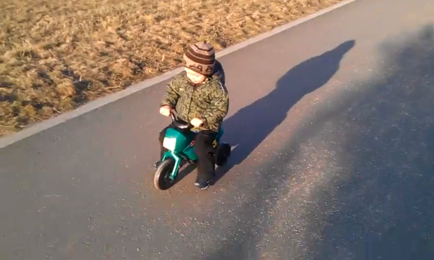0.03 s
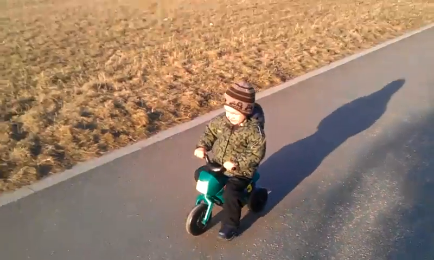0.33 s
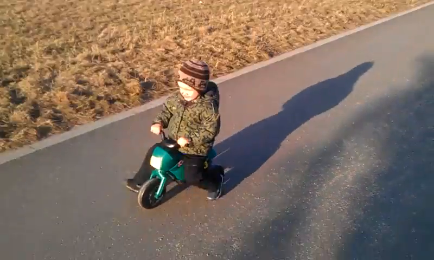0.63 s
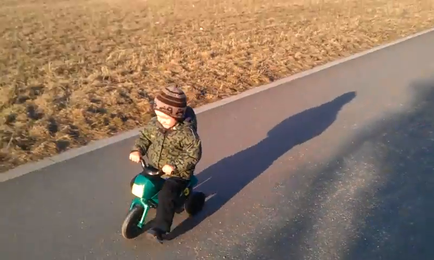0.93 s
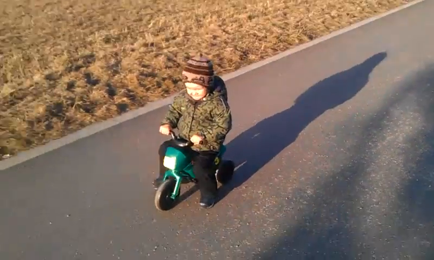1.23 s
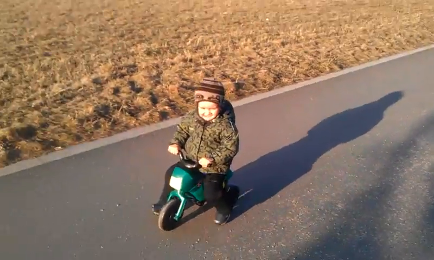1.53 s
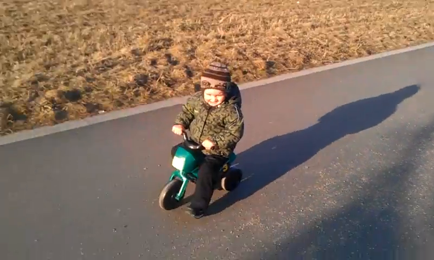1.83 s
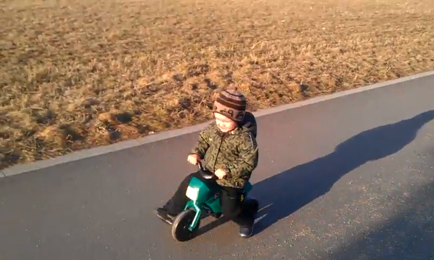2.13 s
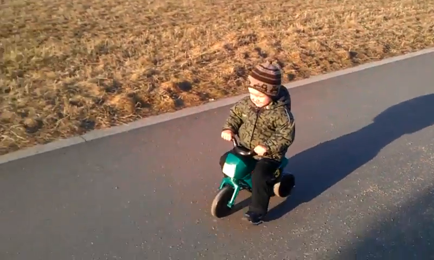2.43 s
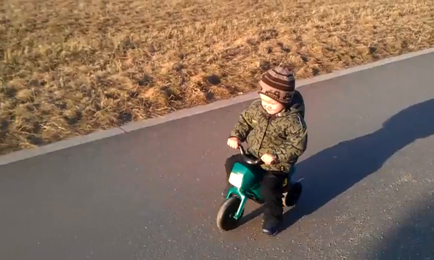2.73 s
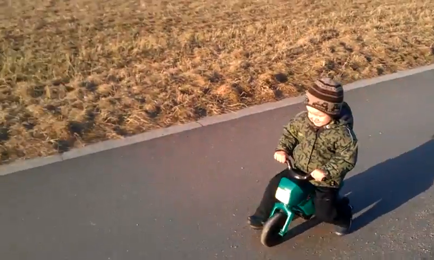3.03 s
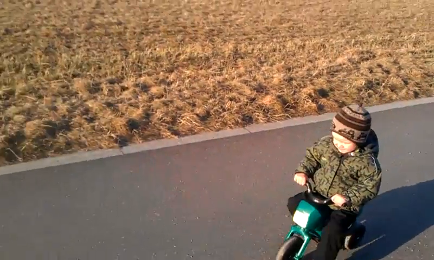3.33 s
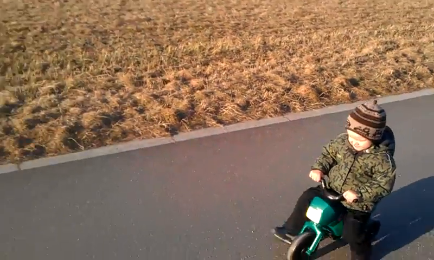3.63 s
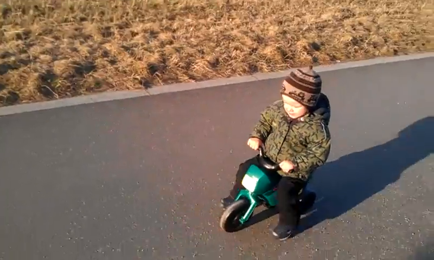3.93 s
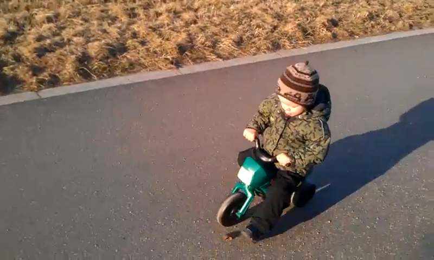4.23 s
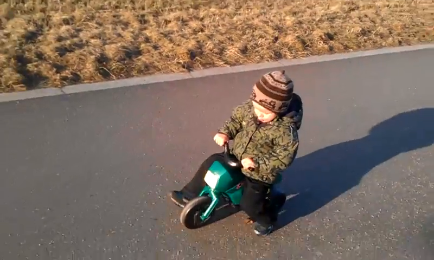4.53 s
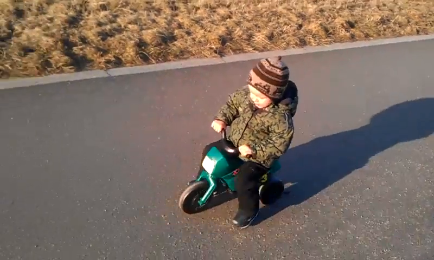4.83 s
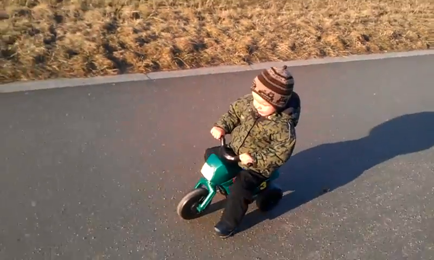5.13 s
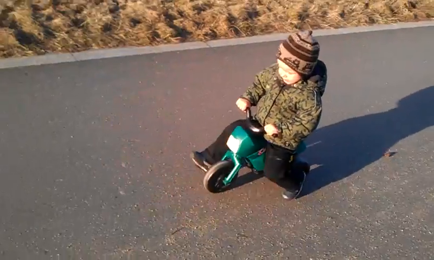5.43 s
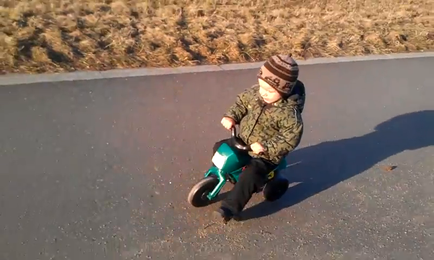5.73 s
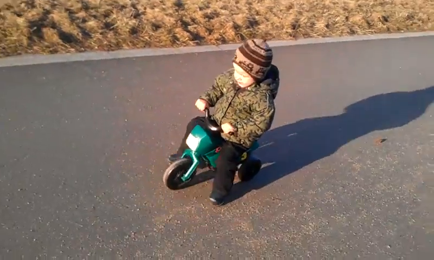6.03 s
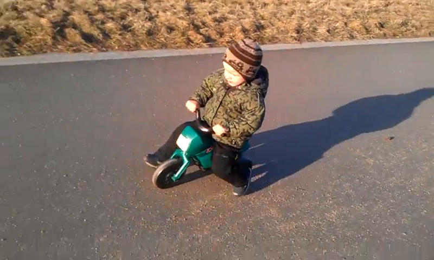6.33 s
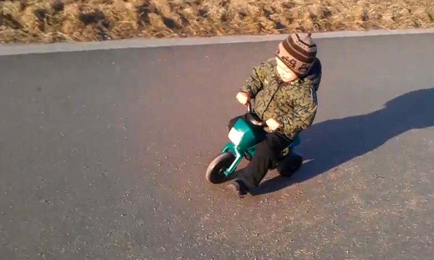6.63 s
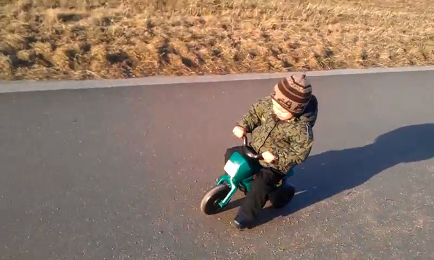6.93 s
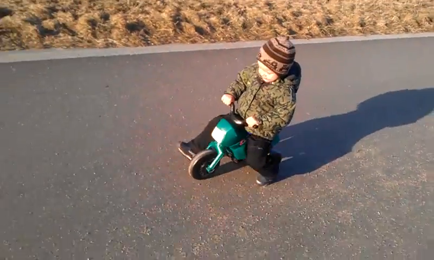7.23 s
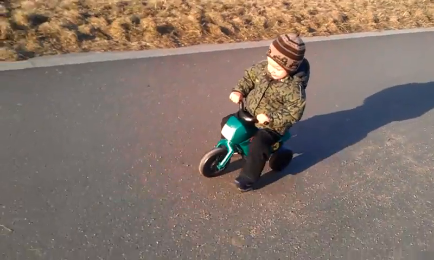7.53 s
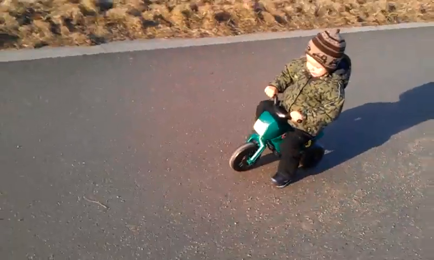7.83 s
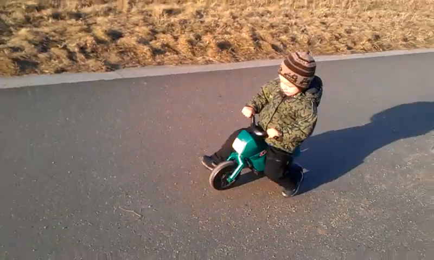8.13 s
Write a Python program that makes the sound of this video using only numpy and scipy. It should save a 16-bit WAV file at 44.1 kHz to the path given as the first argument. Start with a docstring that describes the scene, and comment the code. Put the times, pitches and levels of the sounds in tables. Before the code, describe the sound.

Hard wheels of a plastic ride-on tricycle rattle and tick over gritty asphalt, with hollow knocks, shoe scuffs and light wind.

```python
"""A toddler pushes a plastic ride-on tricycle along an asphalt path, a few steps from the microphone.
From the start and throughout, a light wind rumbles, loose hard wheels tick on their axles, grit
crackles under the treads and the hollow body drums on the rough ground, with scattered scuffs, shoves,
clacks and knocks. The toy draws level, the delay of a close reflection shortens, and the rolling is
loudest just after 4 s. It then eases, while the wheels chatter on to the end."""
import sys
import numpy as np
from scipy import signal
from scipy.fft import rfft, irfft
from scipy.io import wavfile
from scipy.ndimage import uniform_filter1d, map_coordinates

SR = 44100
rng = np.random.default_rng(int(sys.argv[2]) if len(sys.argv) > 2 else 0)


def unload_audio(sound):
    """Save the sound as a 16-bit wav file, at the path given as the first command line argument."""
    columns = np.transpose(np.atleast_2d(sound))
    # keep every value between -1 and 1, then stretch to whole-number steps
    steps = np.round(np.clip(columns, -1, 1) * 32767)
    wavfile.write(sys.argv[1], SR, steps.astype(np.int16))


N = 369558
TIME = np.arange(N) / SR

# spectra of the sources: (frequency [Hz], relative spectral density [dB])
WIND_SPECTRUM = [(15, -19), (35, -4.5), (58, -8.5), (90, -4.5), (200, -12), (800, -28.5)]
RUMBLE_SPECTRUM = [(70, -32), (120, 3), (270, -8), (900, -25.5)]
GRIT_SPECTRUM = [(80, -75), (500, -1), (1100, 3.5), (1500, 3), (2000, 8.5), (2500, 8), (2950, 4.5),
                 (3470, 7.5), (4300, -1.5), (7000, 0), (15000, -17)]
BODY_SPECTRUM = [(50, -28.5), (120, -12), (230, -8.5), (330, -5), (500, -6.5), (670, 2.5), (860, -3.5),
                 (1050, -4), (1300, -18), (5000, -24)]
CLACK_SPECTRUM = [(100, -28), (700, -4), (1300, -7.5), (2100, -3), (3200, -1), (4400, 1), (6000, -1.5),
                  (15000, -40)]
TICK_SPECTRUM = [(60, -42), (400, -12.5), (1400, -22.5), (2300, -9.5), (3000, -11.5), (3500, -10),
                 (4400, -9), (5300, -6.5), (6800, -1.5), (8200, -2.5), (9300, -3.5), (10500, -7),
                 (13000, -10.5), (16000, -23.5)]
# modes of the hollow shell and of wheel and axle: (frequency [Hz], bandwidth [Hz], relative level [dB])
SHELL_MODES = [(338, 81, -1.5), (396, 54, -2), (660.4, 39, -2.5), (813, 21, -1), (927, 95, -1)]
WHEEL_MODES = [(3418, 46, 0), (5160, 680, -15), (5860, 340, -11), (7370, 490, -14.5), (7980, 1280, -4.5)]
# gusts on the microphone: (centre time [s], duration [s], peak level [dB])
GUSTS = [(.1, 0.075, -43.5), (2.2, .3, -67), (4.05, 0.5, -49), (4.21, .17, -41), (5.35, 0.4, -53),
         (7.58, 0.24, -56)]
# lag of a close reflection, shrinking as the toy draws level: (time [s], delay [ms])
REFLECTION_DELAY = [(0, 1.55), (1.9, 1.56), (2.5, 1.56), (3.05, 0.77), (3.5, 0.73), (3.8, 0.63),
                    (4.4, 0.47), (4.9, 0.56), (5.45, 0.33), (6.1, 0.5), (6.75, 0.36), (7.3, 0.5)]
# steady rolling, loudest while the toy is near: (time [s], relative level [dB])
ROLLING_LEVEL = [(0, -40.5), (1.2, -43), (2.5, -41.5), (3.0, -39.5), (3.9, -39.5), (4.3, -34), (5.1, -38.5),
                 (6.2, -40), (6.8, -42), (8.38, -39.5)]
# soles dragging on grit: (centre time [s], duration [s], relative level [dB], rasp frequency [Hz])
SCUFFS = [(0.524, 0.14, -34, 1840), (1.54, 0.19, -41.5, 2140), (2.18, 0.16, -42, 1930),
          (2.855, 0.25, -38, 2280), (3.396, 0.35, -39.5, 2530), (3.727, 0.057, -38, 2500),
          (4.023, 0.16, -37.5, 2580), (4.287, 0.28, -36.5, 2000), (4.566, 0.053, -40, 1880),
          (4.833, 0.039, -35, 1740), (5, 0.039, -34, 2080), (5.11, 0.094, -39, 1900),
          (5.276, 0.054, -35, 2000), (5.75, 0.11, -33, 2880), (6.314, 0.055, -32, 2420),
          (7.72, 0.047, -43, 2620)]
# harder drumming as the feet shove the toy on: (centre time [s], duration [s], peak level [dB])
SHOVES = [(.2, 0.13, -37), (.46, 0.26, -36), (1.53, 0.2, -31.5), (1.93, 0.27, -40), (2.16, 0.32, -39),
          (2.83, 0.094, -33), (3.3, 0.33, -40), (4.47, 0.13, -39.5), (4.79, 0.47, -43), (5.11, 0.087, -36),
          (5.97, 0.12, -35), (6.14, 0.2, -38.5), (6.57, 0.22, -40), (7.2, 0.27, -36.5), (7.93, 0.22, -36)]
# bumps striking the hollow body: (time [s], peak level [dB], ring frequency [Hz])
KNOCKS = [(0.978, -23, 952), (1.493, -28, 690), (1.721, -25.5, 620), (1.758, -30, 920), (1.86, -33, 800),
          (2.12, -32, 680), (2.191, -24.5, 830), (2.755, -27.5, 765), (3.4, -30, 665), (3.64, -27, 774),
          (4.289, -24, 732), (4.419, -26, 875), (4.461, -21, 875), (4.577, -28.5, 800), (4.723, -26.5, 350),
          (4.763, -24, 861), (4.819, -20, 690), (4.829, -22, 752), (5.102, -28.5, 828), (5.283, -25, 700),
          (5.804, -30.5, 660), (5.949, -33, 726), (6.04, -22.5, 843), (6.148, -26.5, 674),
          (6.298, -26.5, 877), (6.944, -19.5, 738), (7.197, -29.5, 697), (7.761, -28, 753)]
# impacts of plastic on plastic: (time [s], relative level [dB], 60 dB decay time [s])
CLACKS = [(0.513, -23, 0.0092), (0.8845, -22, 0.0035), (0.9601, -16.5, 0.028), (3.002, -14.5, 0.0099),
          (4.002, -15, 0.005), (4.022, -27, .012), (4.324, -28, .015), (4.827, -39, .07),
          (5.255, -23.5, .02), (5.9, -48, .012), (6.315, -20, 0.036), (6.941, -27, 0.09)]
# wheels biting into grit: (centre time [s], duration [s], relative level [dB])
GRIT_BITES = [(0.36, 0.22, -24.0), (0.591, 0.069, -24), (0.715, 0.36, -34), (0.803, 0.086, -21),
              (1.022, 0.17, -24.5), (1.19, 0.12, -19), (1.36, 0.13, -20.5), (1.508, 0.41, -28),
              (1.765, 0.24, -28.5), (1.882, 0.081, -26), (2.176, 0.47, -26.0), (2.69, 0.069, -21),
              (2.89, 0.61, -29.5), (3.02, 0.18, -28.5), (3.141, 0.094, -22), (3.443, 0.096, -25.5),
              (3.516, 0.081, -19), (3.604, 0.12, -28), (3.746, 0.095, -19), (3.862, 0.14, -20.5),
              (4.11, 0.41, -29), (4.327, 0.081, -23), (4.546, 0.19, -27), (4.873, 0.12, -30),
              (5.091, 0.11, -21.5), (5.196, 0.084, -20.5), (5.37, 0.15, -23.0), (5.506, 0.36, -29.5),
              (5.753, 0.16, -19.5), (5.974, 0.34, -26), (6.114, 0.1, -21.5), (6.404, 0.12, -19),
              (6.69, 0.21, -27), (6.813, 0.086, -22.5), (7, 0.12, -36), (7.085, 0.094, -25),
              (7.447, 0.046, -26.5), (7.678, 0.44, -32), (7.81, 0.049, -24.0), (7.992, 0.14, -31)]
# hard wheels striking stones: (time [s], level [dB], ring frequency [Hz])
TICKS = [(0.1442, -9.5, 7940), (0.218, -12, 8500), (0.283, -9.5, 7970), (0.3563, -14.0, 7900),
         (0.3649, -15.0, 7900), (0.382, -17, 9300), (0.4022, -16.5, 7600), (0.417, -16.5, 7300),
         (0.4764, -15.5, 7700), (0.5505, -16, 8950), (0.564, -14, 9000), (0.5734, -15.5, 7600),
         (0.5863, -15.5, 8300), (0.6727, -15, 6700), (0.7392, -19, 7400), (0.7916, -17, 8100),
         (0.8127, -18, 7800), (0.823, -14.0, 7900), (0.8835, -14.0, 7740), (0.9607, -18, 4850),
         (0.989, -14.5, 9500), (1.0044, -10, 7600), (1.148, -14.5, 8700), (1.1707, -15, 8150),
         (1.1894, -19, 8700), (1.215, -27, 7900), (1.2338, -16, 6900), (1.3056, -14.5, 8300),
         (1.33, -17.5, 6800), (1.3522, -18, 7050), (1.3865, -20, 7700), (1.3975, -23.5, 7300),
         (1.7055, -16, 7900), (1.76, -13.5, 8400), (1.7795, -13, 8000), (1.814, -15, 8150),
         (1.8271, -14.5, 6100), (1.886, -13.5, 8100), (1.8965, -14.5, 8900), (1.97, -16.0, 7900),
         (1.9964, -24.5, 7520), (2.0245, -20, 8300), (2.034, -11.5, 8200), (2.1266, -15, 7850),
         (2.331, -19.5, 8300), (2.4754, -13, 7800), (2.4838, -17.5, 7500), (2.5466, -16.5, 7600),
         (2.573, -17.5, 7500), (2.6564, -8.5, 7140), (2.6794, -10, 8400), (2.6905, -16, 8400),
         (2.748, -14, 5800), (2.7604, -13.5, 7800), (2.7715, -14, 8400), (2.779, -21, 8100),
         (2.8146, -13.5, 7600), (2.8302, -13.5, 7800), (2.845, -18, 8400), (2.8728, -17, 8000),
         (2.914, -19, 7300), (2.923, -12.5, 7800), (2.981, -21, 7800), (3.002, -14, 4550),
         (3.0393, -15.5, 8600), (3.1309, -12.5, 8500), (3.151, -14, 7260), (3.2288, -15, 9600),
         (3.4012, -13.5, 7800), (3.458, -16, 8100), (3.4868, -11, 8100), (3.5072, -22, 8100),
         (3.5199, -16.5, 7140), (3.575, -18, 8360), (3.5846, -17, 7100), (3.603, -12, 8150),
         (3.6293, -16, 8400), (3.6932, -14.5, 7460), (3.728, -14, 7300), (3.772, -16, 8100),
         (3.8249, -17, 7850), (3.8545, -13.5, 7600), (3.905, -17, 8100), (4.0029, -15, 5200),
         (4.0895, -11, 5850), (4.1125, -14.5, 8000), (4.1259, -21, 8100), (4.1355, -15, 7400),
         (4.1992, -15.5, 8150), (4.2731, -13, 8400), (4.2998, -11.5, 8200), (4.3246, -15.5, 8200),
         (4.3337, -19, 8500), (4.3556, -16.5, 7000), (4.3873, -15.5, 7100), (4.4524, -16, 7400),
         (4.4705, -12, 7300), (4.5461, -13.5, 8300), (4.574, -15, 8400), (4.63, -14, 7700),
         (4.6407, -13, 9000), (4.749, -13, 6200), (4.816, -17.5, 5800), (4.8254, -13.5, 8240),
         (4.8762, -17, 8100), (4.9, -16.5, 8900), (4.9224, -13, 6000), (4.9444, -15.5, 7800),
         (5.0386, -17.0, 7800), (5.0859, -12, 8200), (5.097, -15.5, 7600), (5.1044, -17.5, 6900),
         (5.1778, -14, 7000), (5.326, -17, 7600), (5.3472, -15, 8140), (5.3613, -12, 5250),
         (5.374, -18, 5100), (5.383, -15.5, 7600), (5.4222, -19, 7600), (5.5336, -17, 7900),
         (5.5513, -15, 7800), (5.5651, -15, 7900), (5.5979, -16, 8800), (5.6599, -14, 7700),
         (5.6826, -16, 7840), (5.7201, -12.5, 5750), (5.771, -15, 8100), (5.786, -24, 7300),
         (5.8437, -19.5, 8300), (5.8606, -15, 5440), (5.892, -21, 8400), (5.9001, -7, 4600),
         (5.9197, -22, 8500), (5.9307, -13.5, 8500), (5.959, -15, 5100), (5.9978, -16.0, 7900),
         (6.0768, -14.0, 8500), (6.0915, -10, 7200), (6.2025, -13.5, 7200), (6.244, -9.5, 5430),
         (6.3198, -13.5, 8900), (6.3344, -16, 7040), (6.3492, -17, 6900), (6.3667, -12, 6850),
         (6.3809, -14.5, 6700), (6.4048, -22, 7200), (6.4179, -17.0, 7300), (6.47, -13.5, 6800),
         (6.6203, -8.5, 8000), (6.6878, -13.5, 7800), (6.6993, -13.5, 7700), (6.7368, -15.5, 8200),
         (6.7963, -10, 8100), (6.8253, -16.5, 7700), (6.842, -15, 9200), (6.889, -15, 8200),
         (6.9354, -14.5, 7400), (6.96, -13.5, 9000), (6.9938, -10.5, 9300), (7.0966, -14, 8900),
         (7.1033, -13, 7600), (7.1958, -13.5, 7600), (7.241, -16.5, 7500), (7.297, -13, 7350),
         (7.4441, -15, 9100), (7.4594, -15, 6760), (7.591, -7, 9400), (7.6438, -16.5, 7400),
         (7.6753, -15, 7900), (7.6881, -13, 7500), (7.704, -14.5, 8100), (7.7232, -18, 7860),
         (7.7392, -10, 7900), (7.8085, -14, 7400), (7.8205, -15, 7900), (7.8835, -13, 7900),
         (7.92, -13, 8000), (7.962, -9, 7800), (7.981, -13.5, 8200), (8.0252, -13, 7850),
         (8.0745, -13, 8560), (8.1115, -9, 8200), (8.1302, -19, 8500), (8.232, -13.5, 7800),
         (8.3203, -13.5, 8900)]


def undb(db):
    """Amplitude ratio of a level in decibels."""
    return 10 ** (np.asarray(db) / 20)


def unit(x):
    """Normalisation to rms 1."""
    return x / np.sqrt(np.mean(x ** 2))


def unit_peak(x):
    """Normalisation of the loudest 2 ms to rms 1."""
    return x / np.sqrt(uniform_filter1d(x ** 2, 88).max())


def curve(table):
    """Linear interpolation of (time, value) rows at every sample."""
    return np.interp(TIME, *np.transpose(table))


def add(out, start_s, x):
    """Superposition of x on out, beginning at start_s."""
    i = int(np.clip(start_s * SR, 0, len(out) - 1))
    out[i:i + len(x)] += x[:len(out) - i]


def fade(t, t60):
    """Exponential decay by 60 dB in t60 seconds."""
    return np.exp(-np.log(1000) * t / t60)


def swells(table):
    """Amplitude envelope of half-sine arches, one for each (centre time, duration, level) row."""
    gain = np.zeros(N)
    for centre, length, db in table:
        add(gain, centre - length / 2, undb(db) * np.sin(np.linspace(0, np.pi, int(length * SR))))
    return gain


def wander(rate_hz):
    """Slow random modulation of rms 1: Gaussian values joined by straight lines."""
    step = int(SR / rate_hz)
    return unit(uniform_filter1d(np.repeat(rng.standard_normal(N // step + 1), step), step)[:N])


def grains(per_s, spread_db):
    """Poisson process of impulses with log-normal amplitudes."""
    chance, size = rng.random(N), rng.standard_normal(N)
    return (chance < per_s / SR) * undb(spread_db * np.clip(size, -2, 2))


def bursts(hits, t60):
    """Incoherent summation: each impulse starts a decaying noise burst, and their powers add."""
    power = signal.fftconvolve(hits ** 2, fade(TIME[:SR // 10], t60) ** 2)[:N]
    return np.sqrt(np.abs(power)) * rng.standard_normal(N)


def colour(x, spectrum, size=4096):
    """Minimum-phase filtering to a given spectrum; folding the cepstrum makes the response causal."""
    hz, db = np.transpose(spectrum)
    bins = np.maximum(np.arange(size // 2 + 1) * SR / size, 1)
    magnitude = undb(np.interp(np.log(bins), np.log(hz), db))
    cepstrum = irfft(np.log(magnitude))
    cepstrum[1:size // 2] *= 2
    cepstrum[size // 2 + 1:] = 0
    return signal.fftconvolve(x, irfft(np.exp(rfft(cepstrum))))[:len(x)]


def resonate(x, hz, width_hz):
    """Forced response of a damped resonator, with gain 1 at its centre."""
    return signal.lfilter(*signal.iirpeak(hz, hz / width_hz, fs=SR), x)


def delayed(x, lag_s):
    """Propagation delay along a path of changing length."""
    return map_coordinates(x, [np.arange(N) - lag_s * SR], order=3)


def wind(flutter_db=1.5, breeze_db=-58):
    """Turbulence: pressure fluctuations on the microphone make a low rumble with a few gusts."""
    rumble = unit(colour(rng.standard_normal(N), WIND_SPECTRUM))
    breeze = undb(breeze_db + flutter_db * wander(rate_hz=13))
    return rumble * np.hypot(breeze, swells(GUSTS))


def treads(rumble_db=-52, hiss_db=-44):
    """Roughness excitation: steady rolling contact gives a lumpy low rumble and a fine even hiss."""
    lumps = bursts(grains(per_s=160, spread_db=4), t60=0.014)
    rumble = unit(colour(lumps, RUMBLE_SPECTRUM))
    hiss = unit(colour(rng.standard_normal(N), TICK_SPECTRUM))
    return undb(rumble_db) * rumble + undb(hiss_db) * hiss


def with_reflections(direct, near_db=-6, legs_db=-9, legs_lag_s=0.001093, sway=0.191):
    """Comb filtering: reflections from a close surface and the swinging legs join the direct sound."""
    # small surfaces mirror only the short waves
    treble = signal.sosfilt(signal.butter(1, 1500, "high", fs=SR, output="sos"), direct)
    softened = signal.sosfiltfilt(signal.butter(1, 6000, fs=SR, output="sos"), treble)
    near = delayed(softened, curve(REFLECTION_DELAY) / 1000)
    legs = delayed(treble, legs_lag_s * np.exp(sway * wander(rate_hz=4)))
    return direct + undb(near_db) * near + undb(legs_db) * legs


def scattered_tail(chatter, t60=0.024, gain_db=-13):
    """Diffuse scattering: ground and frame spread the chatter into a faint smooth tail."""
    return undb(gain_db) * np.std(chatter) * unit(wheel_response(bursts(chatter, t60)))


def axle_sizzle(impacts, hz=8200, width_hz=660, t60=0.13, gain_db=-10):
    """Resonant decay: a high resonance of the axle keeps sizzling after the ticks that excite it."""
    ring = resonate(bursts(impacts, t60), hz, width_hz)
    return undb(gain_db) * np.std(impacts) * unit(resonate(ring, hz, width_hz))


def grit_crackle(gain_db=-8.5, wander_db=3, ring_db=2, sizes=6):
    """Shot noise: grit crackles under the treads in clusters, coarse grains lower than fine ones."""
    crackle = np.zeros(N)
    for hz in np.geomspace(2000, 5000, sizes):
        grit = bursts(grains(per_s=520 / sizes, spread_db=5), t60=0.011)
        crackle += grit + undb(ring_db) * resonate(grit, hz, hz / 5)
    level_db = curve(ROLLING_LEVEL) + gain_db + wander_db * wander(rate_hz=20)
    return unit(colour(crackle, GRIT_SPECTRUM)) * undb(level_db)


def sole_scuffs(rasp_db=-3, rasp_width_hz=900, gain_db=-1):
    """Sliding friction: each sole drags over the grit in a broken crunch with a rasp of its own pitch."""
    out = np.zeros(N)
    grit = colour(bursts(grains(per_s=380, spread_db=5), t60=0.011), GRIT_SPECTRUM)
    for *swell, hz in SCUFFS:
        rasp = undb(rasp_db) * resonate(grit, hz, rasp_width_hz)
        out += swells([swell]) * unit(grit + rasp)
    return undb(gain_db) * out


def body_drumming(chatter, jolt_db=-8, jolt_t60=0.054, ring_db=-5):
    """Forced vibration: rough ground and wheel ticks shake the hollow shell, and bumps ring its modes."""
    road = unit(bursts(grains(per_s=200, spread_db=5.5), t60=0.032))
    jolts = undb(jolt_db) * unit(bursts(chatter, jolt_t60))
    drum = unit(colour(road + jolts, BODY_SPECTRUM))
    modes = sum(undb(db) * unit(resonate(grains(per_s=40, spread_db=3), hz, width))
                for hz, width, db in SHELL_MODES)
    ring = undb(ring_db) * unit(colour(modes, BODY_SPECTRUM))
    return unit(drum + ring) * np.hypot(undb(curve(ROLLING_LEVEL)), swells(SHOVES))


def body_knocks(thud_t60=0.057, ring_db=1, ring_t60=0.061, bounce_s=0.012, bounce_db=-4):
    """Free vibration: the shell thuds and rings at a bump, and rings again as the toy drops back."""
    out, t = np.zeros(N), TIME[:SR // 8]
    for start, db, hz in KNOCKS:
        thud = unit_peak(colour(rng.standard_normal(len(t)) * fade(t, thud_t60), BODY_SPECTRUM))
        late, detune = np.clip(rng.standard_normal(2), -2, 2)
        bounce_hz = hz * np.exp(0.085 * detune)
        ring, bounce = (np.sin(2 * np.pi * f * t) * fade(t, ring_t60) for f in (hz, bounce_hz))
        add(ring, bounce_s * np.exp(0.3 * late), undb(bounce_db) * bounce)
        add(out, start, undb(db) * unit_peak(thud + undb(ring_db) * unit_peak(ring)))
    return out


def plastic_clacks(tail_db=-16, tail_t60=0.21, gain_db=-1):
    """Two-stage decay: plastic parts slap together with a short crack, then shiver briefly."""
    out, t = np.zeros(N), TIME[:SR // 8]
    for start, db, t60 in CLACKS:
        slap = rng.standard_normal(len(t)) * (fade(t, t60) + undb(tail_db) * fade(t, tail_t60))
        add(out, start, undb(db + gain_db) * unit_peak(colour(slap, CLACK_SPECTRUM)))
    return out


def wheel_response(force, scatter_db=0, direct_db=-8):
    """Modal superposition in wheel and axle; scatter_db varies the modes as the striking point would."""
    offsets = np.clip(rng.standard_normal((len(WHEEL_MODES), 2)), -1, 1)
    modes = np.zeros(len(force))
    for (hz, width, db), (louder, higher) in zip(WHEEL_MODES, offsets):
        mode_hz = hz * np.exp(0.012 * scatter_db * higher)
        modes += undb(db + scatter_db * louder) * resonate(force, mode_hz, width)
    return colour(undb(direct_db) * force + modes, TICK_SPECTRUM, size=1024)


def wheel_contact(t60=0.013, snap_db=5, snap_t60=0.002, rebound_s=0.003, rebound_db=-4):
    """Impact and rebound: a loose wheel snaps against its stop, cleanly or with a brief grind."""
    t = TIME[:SR // 32]
    noise = rng.standard_normal(len(t))
    late, grind = np.clip(rng.standard_normal(2), -2, 2)
    grind_t60 = t60 * np.exp(0.48 * grind)
    since_rebound = t - rebound_s * np.exp(0.38 * late)
    rebound = (since_rebound > 0) * fade(np.abs(since_rebound), grind_t60) * undb(rebound_db)
    blow = np.hypot(fade(t, grind_t60), undb(snap_db) * fade(t, snap_t60))
    return unit_peak(wheel_response(noise * np.hypot(blow, rebound), scatter_db=5))


def wheel_rattle(per_s=240, coast_db=-33, bite_db=-3, wander_db=1.5, ring_db=7, sizes=24):
    """Random impacts: small ticks swell as the wheels bite into grit, each stone size at its own pitch."""
    rattle = np.zeros(N)
    for hz in np.geomspace(3800, 11000, sizes):
        contact = wheel_contact()
        contact = unit_peak(contact + undb(ring_db) * resonate(contact, hz, hz / 8))
        rattle += signal.oaconvolve(grains(per_s / sizes, spread_db=5), contact)[:N]
    rattle = unit(rattle * undb(wander_db * wander(rate_hz=40)))
    bite = np.max([swells([row]) for row in GRIT_BITES], axis=0)
    return rattle * np.hypot(undb(coast_db), undb(bite_db) * bite)


def wheel_ticks(ring_db=5, ring_width_hz=420, crack_db=-13, crack_t60=0.0018):
    """Impulse excitation: a stone cracks under the tread; the wheel rings at the struck spot's pitch."""
    out = np.zeros(N)
    for start, db, hz in TICKS:
        contact = wheel_contact()
        crack = np.diff(rng.standard_normal(len(contact) + 1)) * fade(TIME[:len(contact)], crack_t60)
        tick = unit_peak(contact + undb(ring_db) * resonate(contact, hz, ring_width_hz))
        add(out, start, undb(db) * (tick + undb(crack_db) * unit_peak(crack)))
    return out


def scene():
    """Linear superposition of the rolling toy, its reflections and the wind, in mono."""
    ticks = wheel_ticks()
    chatter = ticks + wheel_rattle()
    toy = chatter + body_drumming(chatter) + grit_crackle() + sole_scuffs()
    toy = toy + body_knocks() + plastic_clacks()
    mix = with_reflections(toy) + scattered_tail(chatter) + axle_sizzle(ticks) + treads() + wind()
    return mix[None]


def record(dry, limit_db=-13, ceiling_db=-4, window_samples=66, cutoff_hz=16000):
    """Dynamic compression: a fast limiter and soft clipping flatten the loudest ticks before a low-pass."""
    level = np.sqrt(np.abs(uniform_filter1d(dry ** 2, window_samples)))
    gain = uniform_filter1d(1 / np.maximum(1, level / undb(limit_db)), window_samples)
    limited = dry * gain
    rounded = limited / np.sqrt(np.hypot(1, (limited / undb(ceiling_db)) ** 2))
    return signal.sosfilt(signal.ellip(10, 0.2, 70, cutoff_hz, fs=SR, output="sos"), rounded)


dry = scene()
out = record(dry)
unload_audio(out)
```